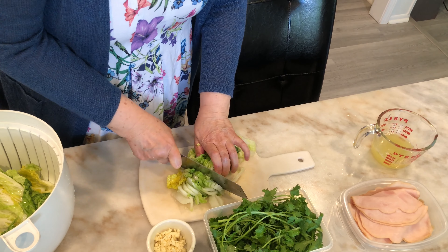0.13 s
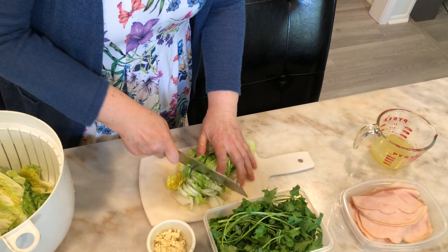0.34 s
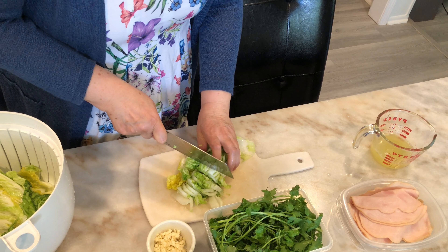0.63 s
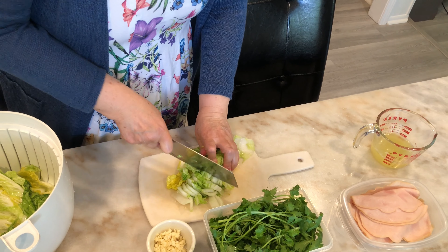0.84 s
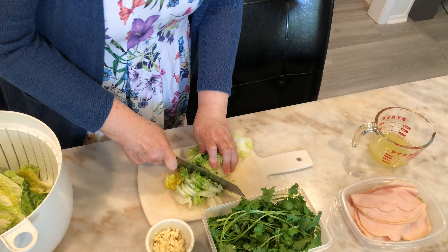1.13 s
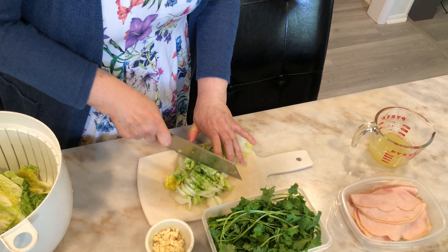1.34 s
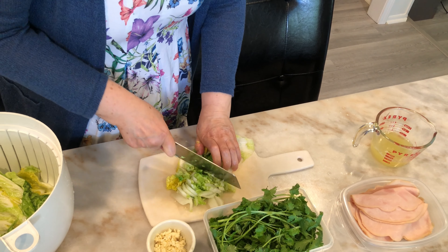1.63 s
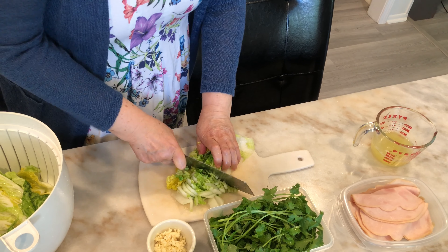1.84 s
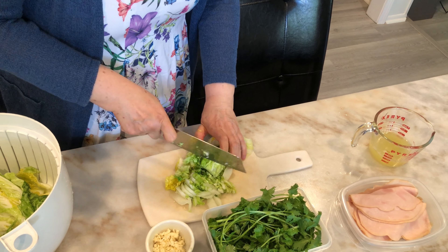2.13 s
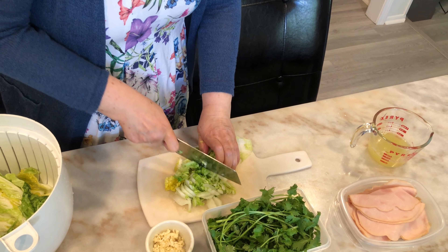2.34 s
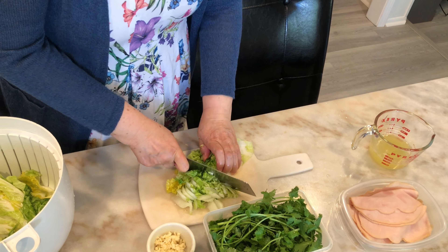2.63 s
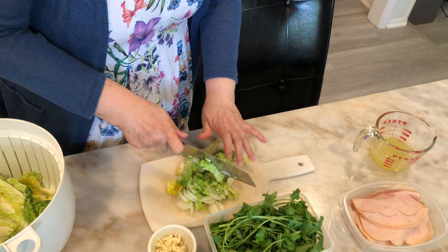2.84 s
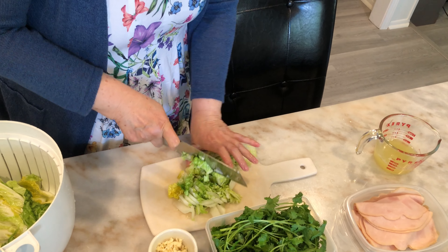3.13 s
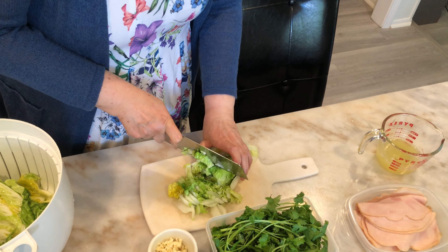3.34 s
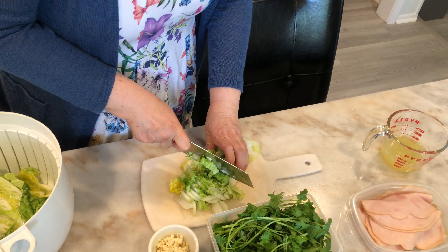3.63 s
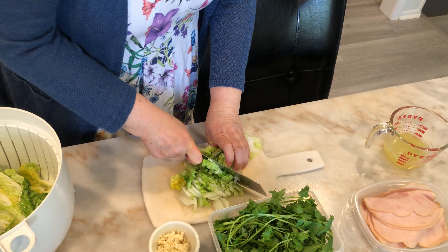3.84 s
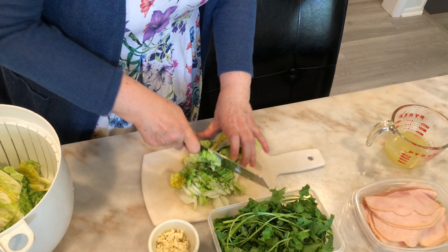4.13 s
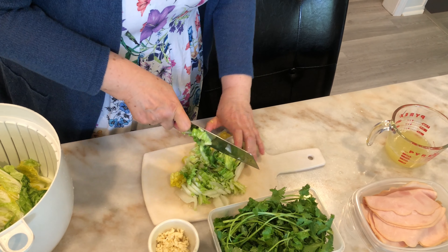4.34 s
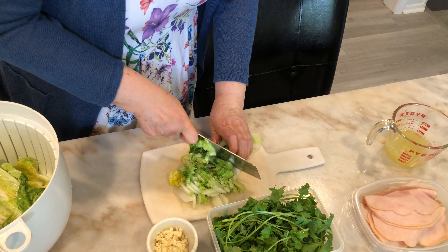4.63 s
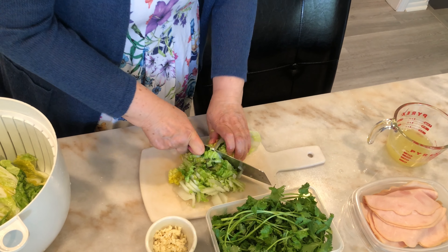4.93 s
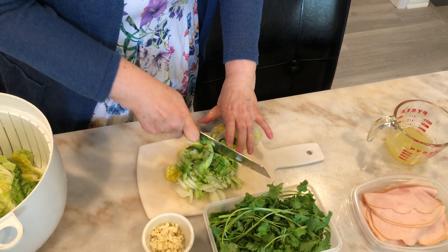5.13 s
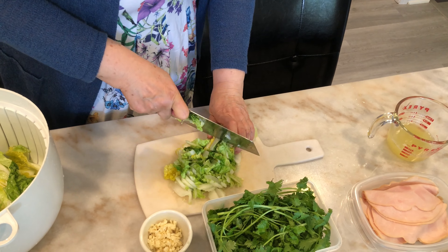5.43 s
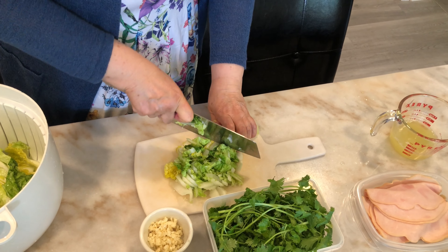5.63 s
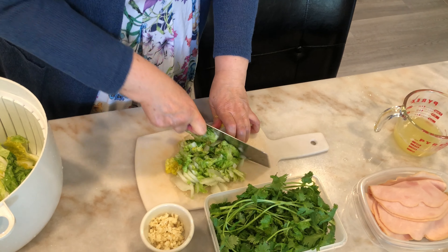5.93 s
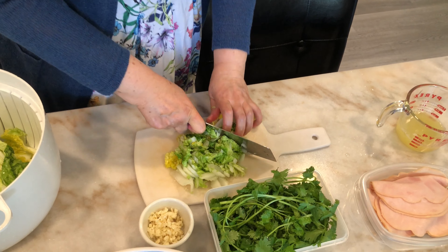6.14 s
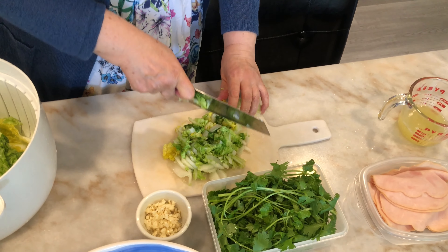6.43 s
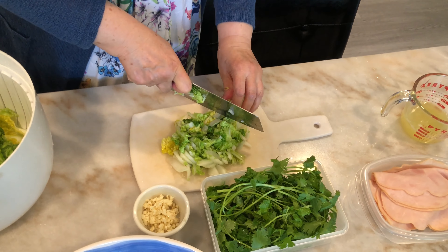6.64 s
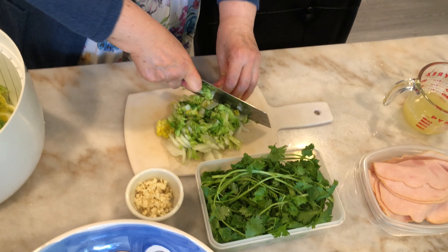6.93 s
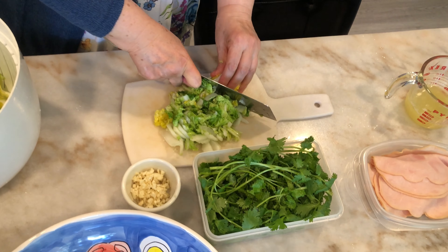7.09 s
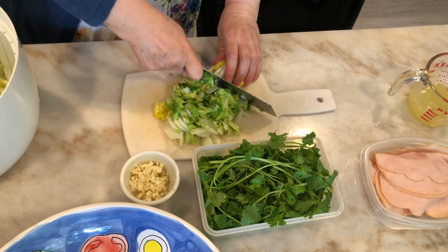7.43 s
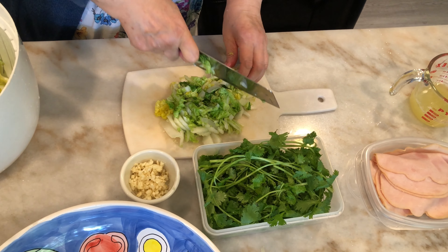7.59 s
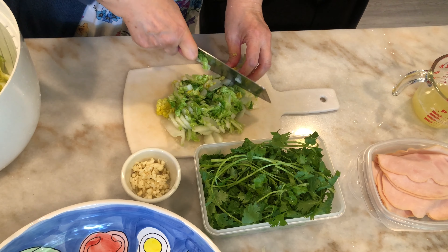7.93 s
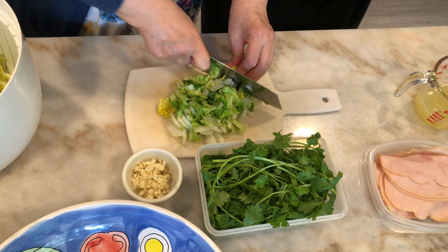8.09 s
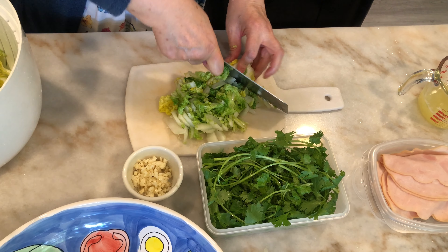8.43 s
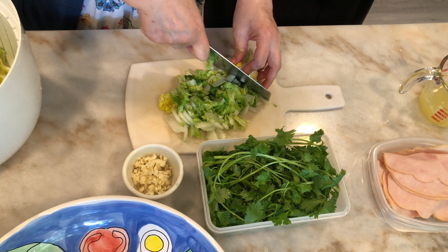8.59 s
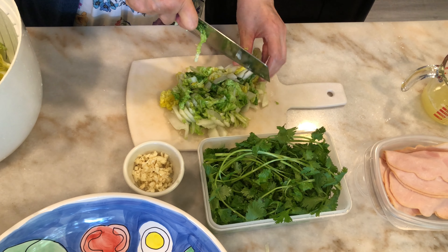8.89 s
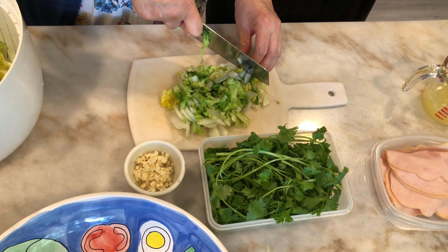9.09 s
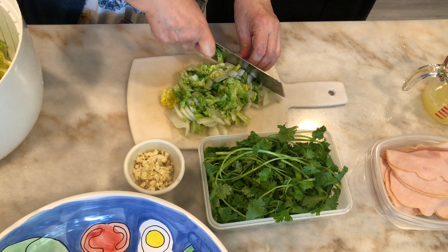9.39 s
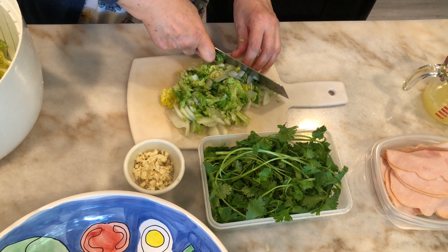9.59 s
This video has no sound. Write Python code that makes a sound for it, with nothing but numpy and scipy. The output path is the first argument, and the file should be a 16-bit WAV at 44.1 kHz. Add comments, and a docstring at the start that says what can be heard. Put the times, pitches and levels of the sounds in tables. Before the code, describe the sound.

A large knife slowly cuts cabbage on a plastic board, each crunch ending in a knock, over a faint low kitchen hum.

```python
"""Shredding cabbage

A large knife cuts cabbage on a plastic board on a stone counter, about one stroke a second.
Each stroke is a swelling crunch of fracturing fibres that ends in an impact: the edge excites the
modes of the board and the counter booms. An appliance hums low in the quiet, reverberant kitchen.
The stereo image is now wide and crisp, now narrow and duller."""
import sys
import numpy as np
from scipy import signal
from scipy.fft import rfft, irfft, next_fast_len
from scipy.io import wavfile

SR = 44100
rng = np.random.default_rng(int(sys.argv[2]) if len(sys.argv) > 2 else 0)


def transcribe(u):
    """Save the signal u as a 16-bit wav file named by the first command-line argument.

    u: samples, shape (n,) or (channels, n), limited to [-1, 1]; the rate is SR.
    q: integer samples, one column per channel.
    """
    v = np.clip(np.atleast_2d(u).T, -1, 1)
    q = np.round(v * 32767).astype(np.int16)
    wavfile.write(sys.argv[1], SR, q)


N = 429975
TIME = np.arange(N) / SR

# Levels in the tables are relative: each layer adds a gain of its own.
# Strokes of the blade; down_s is its arrival at the board, draw_db the step in level as it slides on:
# down_s, descent_s, snap_db, crush_db, shear_db, push_db, pinch_db, draw_db
STROKES = [(0.419, 0.14, -44.5, -42.5, -55, -29, -36, 0), (1.339, 0.17, -48.5, -50.5, -85, -49, -20, -6),
           (2.17, 0.18, -47.5, -45.5, -64, -43, -38, -5), (2.879, 0.12, -45, -40.5, -61, -39.5, -37, -1.5),
           (4.205, 0.13, -43, -42, -68.5, -36, -50, -0.5), (5.152, 0.18, -42.5, -38.5, -53, -33, -38, -7),
           (6.336, 0.15, -45.5, -42.5, -62, -40, -51.5, -1.5),
           (7.374, 0.22, -46, -44.5, -62, -41.5, -35.5, -2),
           (8.519, 0.26, -50, -51, -59, -43.5, -35.5, -1.5), (9.75, 0.26, -51, -61, -55, -45.5, -40, -5)]
# Impacts of the edge on the board: time_s, peak_db, boom_db, ring_db, treble_db
KNOCKS = [(0.417, -17, -13.5, -32.5, -55), (1.338, -8.5, -19.5, -22, -22), (2.17, -27, -44, -43.5, -50),
          (2.879, -24, -36, -33, -58), (4.206, -22.5, -21, -44, -49), (4.221, -29, -38.5, -40.5, -38),
          (5.152, -16, -15.5, -27.5, -56), (6.334, -20.5, -44.5, -32, -51), (7.372, -24, -40, -35, -32),
          (8.521, -22, -45, -41.5, -28.5), (8.553, -34, -34.5, -34.5, -42), (9.724, -29, -30.5, -51, -29.5)]
# Soft bumps of hand and knife against the board: time_s, scuff_db, boom_db
BUMPS = [(0.195, -59, -33), (8.755, -58.5, -40.5), (8.889, -41.5, -26.5), (8.922, -35, -28),
         (8.945, -40, -22.5), (9.003, -46, -26), (9.023, -56.5, -27), (9.558, -70, -33),
         (9.629, -74, -32.5)]
# Spectrum of the crisp crunch as heard through the narrow, duller microphone pickup:
# frequency_hz, level_db
HEARD_CRUNCH = [(100, -26), (900, -7), (1800, -0.5), (3000, 3), (4100, -3.5), (6000, -7.5), (7200, -22.5),
                (9500, -28), (11200, -38.5), (12400, -16.5), (15500, -31)]
# Spectrum of the contact between edge and board: frequency_hz, level_db
CONTACT_SPECTRUM = [(40, -15.5), (130, -3.5), (320, 6), (700, -4), (1300, -2.5), (2000, -5.5),
                    (3200, -10.5), (5000, -22), (12000, -64)]


def from_db(db):
    """Amplitude ratio of a level in decibels."""
    return 10 ** (np.asarray(db) / 20)


def at_hz(points, hz, axis=1):
    """Interpolation of one table column on a logarithmic frequency axis."""
    points = np.array(points, float)
    return np.interp(np.log(hz + 1e-3), np.log(points[:, 0]), points[:, axis])


def convolve(x, response):
    """A linear system convolves its input with its impulse response."""
    return signal.oaconvolve(x, response)[:N]


def pulse(spectrum, size=4096):
    """Folding the cepstrum gives a minimum-phase pulse with this spectrum, scaled to unit energy."""
    hz = np.fft.rfftfreq(size, 1 / SR)
    cepstrum = irfft(np.log(from_db(at_hz(spectrum, hz))))
    cepstrum[1:size // 2] *= 2
    cepstrum[size // 2 + 1:] = 0
    shape = irfft(np.exp(rfft(cepstrum)))
    return shape / np.linalg.norm(shape)


def clicks(times, level_db):
    """An impulse train, one impulse for each event."""
    out = np.zeros(N)
    out[np.clip(np.round(times * SR).astype(int), 0, N - 1)] = from_db(level_db)
    return out


def swell(rise_s):
    """A critically damped envelope that peaks at 1 after rise_s."""
    t = TIME[:SR // 2]
    return t / rise_s * np.exp(1 - t / rise_s)


def grains(per_s, spread_db):
    """Shot noise: impulses of random time, sign and size, scaled to rms 1."""
    sizes = from_db(spread_db * np.minimum(rng.exponential(1, N), 4))
    shots = sizes * rng.choice([-1, 1], N) * (rng.random(N) < per_s / SR)
    return shots / np.sqrt(np.mean(shots ** 2) + 1e-20)


def strike(times, level_db, spectrum, rise_s):
    """Each event is a superposition of tiny contacts in a brief flurry."""
    envelope = convolve(clicks(times, level_db), swell(rise_s))
    return convolve(envelope * grains(per_s=12000, spread_db=-2), pulse(spectrum))


def hum():
    """Stationary filtered noise: the low drone of an appliance over faint air noise."""
    # Spectrum of drone and air: frequency_hz, level_db
    hum_spectrum = [(15, -55.5), (25, -14), (59, -14.5), (101, -28), (169, -1.5), (253, -9.5), (567, -27.5),
                    (871, -32.5), (1050, -38), (2420, -39.5), (2920, -43.5), (3170, -43), (6920, -55),
                    (13900, -58.5), (15500, -71)]
    drone = convolve(rng.standard_normal(N), pulse(hum_spectrum))
    low_pass = signal.butter(4, 6500, fs=SR, output="sos")
    return from_db(-53) * signal.sosfilt(low_pass, drone)


def shifting():
    """Envelope of friction in the heap: smooth swells over a faint rustle under the hand."""
    # Leaves shifted by hand and blade between strokes: time_s, half_length_s, level_db
    shifts = [(0.134, 0.038, -68.5), (0.197, 0.041, -56.5), (0.81, 0.024, -72), (2.721, 0.016, -62),
              (3.836, 0.065, -65), (3.982, 0.032, -66), (5.777, 0.091, -70.5), (6.09, 0.016, -69),
              (6.585, 0.034, -69), (6.966, 0.052, -73), (7.154, 0.055, -74), (7.96, 0.1, -71),
              (8.216, 0.077, -69), (8.69, 0.056, -61.5), (8.952, 0.088, -65.5), (9.217, 0.054, -72.5),
              (9.453, 0.021, -72)]
    swells = sum(from_db(db) * np.maximum(1 - ((TIME - time_s) / (2 * half_s)) ** 2, 0) ** 2
                 for time_s, half_s, db in shifts)
    return from_db(-78.5) + swells


def clumps(depth_db=4, per_s=110):
    """Random amplitude modulation: leaf after leaf gives way, so the crunch comes in clumps."""
    return from_db(depth_db * np.interp(TIME * per_s, np.arange(N), rng.standard_normal(N)))


def cutting(top_db, swell_db, bend):
    """Envelope of fracture: it swells as the cut deepens, sags as the blade slides, dies as it lifts."""
    ease_in_s, creep_s, creep_db = 0.012, 0.065, -12
    draw_s, sag_db_per_s, lift_db_per_s = 0.034, 57.5, 389
    out = np.zeros(N)
    for (down_s, descent_s, *_, draw_db), db in zip(STROKES, top_db):
        near = np.abs(TIME - down_s) < .5
        t = TIME[near] - down_s
        sinking_db = -swell_db * np.clip(-t / descent_s, 0, 1) ** bend
        drawn_db = draw_db - sag_db_per_s * t - lift_db_per_s * np.maximum(t - draw_s, 0)
        # the edge creases the outer leaf before its first bite
        creep = from_db(creep_db) * np.exp(np.minimum(t + descent_s, 0) / creep_s)
        touch = np.clip((t + descent_s) / ease_in_s, creep, 1)
        out[near] += touch * from_db(db + np.where(t < 0, sinking_db, drawn_db))
    return out


def pinch(rise_s=0.0072, fall_s=0.0066):
    """Envelope of compression: the last leaves give way between edge and board in a short burst."""
    out = np.zeros(N)
    for down_s, *_, pinch_db, _ in STROKES:
        near = np.abs(TIME - down_s) < .1
        t = TIME[near] - down_s
        out[near] += from_db(pinch_db) * np.exp(np.minimum(t / rise_s, -t / fall_s))
    return out


def stray_cracks(envelope, spectrum, per_s, over_db):
    """A Poisson process of single cracks whose level follows a layer's envelope."""
    now = (rng.random(N) < per_s / SR) & (envelope > 0)
    return strike(TIME[now], 20 * np.log10(envelope[now]) + over_db, spectrum, rise_s=0.00031)


def cabbage():
    """Fracture and friction: fibres snap, leaf is crushed, steel hisses, ribs crack, shreds rustle."""
    # Fractures of thick ribs: time_s, peak_db
    rib_cracks = [(0.136, -52), (0.3007, -47), (0.3452, -30.5), (1.2695, -39.5), (2.002, -47), (2.058, -44),
                  (2.0815, -36), (2.7915, -40), (4.1, -38.5), (5.0066, -50), (5.0516, -34), (6.0832, -53),
                  (7.138, -46), (8.317, -40), (8.3422, -37), (8.4938, -29), (8.7012, -44), (9.0795, -48),
                  (9.2178, -52), (9.507, -44.5), (9.637, -48), (9.6784, -41)]
    # Spectrum of leaf being crushed: frequency_hz, level_db
    crush_spectrum = [(60, -11), (300, 6.5), (560, -3.5), (690, 6.5), (850, 0.5), (1250, -0.5), (1700, 0.5),
                      (2800, -16.5), (9000, -56.5)]
    # Spectrum of steel sliding through wet leaf: frequency_hz, level_db
    shear_spectrum = [(1000, -35.5), (3500, -21.5), (5800, 0.5), (7000, -11), (9500, -22.5), (11200, -21.5),
                      (12400, -26), (15500, -28.5)]
    # Spectrum of rustling shreds as heard through the narrow, duller microphone pickup:
    # frequency_hz, level_db
    heard_rustle = [(400, -6.5), (750, 2.5), (1400, 2), (2300, -0.5), (3300, -5), (4300, -14), (5800, -13),
                    (7200, -30), (11200, -33.5), (12500, -25.5), (15500, -38.5)]
    snap_db, crush_db, shear_db = np.transpose(STROKES)[2:5]
    giving, loose = clumps(), shifting()
    fibres = cutting(snap_db, swell_db=19, bend=1.6)
    leaf = cutting(crush_db, swell_db=22.5, bend=1.3) + pinch()
    snaps = fibres * giving * grains(per_s=4500, spread_db=2.5) * from_db(-4.5)
    crush = leaf * giving * grains(per_s=2000, spread_db=5.5) * from_db(-2)
    friction = grains(per_s=9000, spread_db=1)
    shear = cutting(shear_db, swell_db=15, bend=2.6) * clumps() * friction * from_db(-7)
    shreds = loose * clumps() * grains(per_s=1100, spread_db=2) * from_db(-3.5)
    times, peak_db = np.transpose(rib_cracks)
    thick_ribs = strike(times, peak_db - 7.5, HEARD_CRUNCH, rise_s=0.00074)
    thick_ribs += strike(times, peak_db - 12.5, crush_spectrum, rise_s=0.0014)
    small_ribs = stray_cracks(fibres, HEARD_CRUNCH, per_s=30, over_db=6)
    ticks = stray_cracks(loose, heard_rustle, per_s=14, over_db=10)
    layers = ((snaps, HEARD_CRUNCH), (crush, crush_spectrum),
              (shear, shear_spectrum), (shreds, heard_rustle))
    crunch = sum(convolve(source, pulse(spectrum)) for source, spectrum in layers)
    return thick_ribs + small_ribs + ticks + crunch


def bumps():
    """Soft contact carries little treble: hand and handle touch and drag dully on the board."""
    # Spectrum of a scuff: frequency_hz, level_db
    scuff_spectrum = [(40, -24), (120, -17), (300, 16.5), (450, 14), (560, 1), (690, 14), (820, -5),
                      (1400, -21.5), (2500, -57), (9000, -85)]
    times, scuff_db, _ = np.transpose(BUMPS)
    touch = strike(times, scuff_db + 4, scuff_spectrum, rise_s=0.0027)
    drag = strike(times, scuff_db - 4, scuff_spectrum, rise_s=0.02)
    return touch + drag


def boom(times, level_db, rise_s):
    """A damped resonance of the counter builds and decays; its pitch varies with the spot struck."""
    nominal_hz, dip, settle_s = 177.7, 0.12, 0.019   # it starts flat under the load of the blade
    out, t = np.zeros(N + SR), TIME[:SR // 2]
    cycles = nominal_hz * np.cumsum(1 - dip * np.exp(-t / settle_s)) / SR
    for time_s, db, detune in zip(times, level_db, rng.uniform(-0.022, 0.029, len(times))):
        at = int(time_s * SR)
        out[at:at + len(t)] += from_db(db) * swell(rise_s) * np.sin(2 * np.pi * cycles * (1 + detune))
    return out[:N]


def counter(rock_s=0.055):
    """Impacts excite the counter, again as the board rocks back; a resting hand damps a bump's boom."""
    knock_s, _, knock_db, _, _ = np.transpose(KNOCKS)
    bump_s, _, bump_db = np.transpose(BUMPS)
    struck = boom(knock_s, knock_db - 1, rise_s=.023)
    rocked = boom(knock_s + rock_s, knock_db - 12.5, rise_s=0.02)
    return struck + rocked + boom(bump_s, bump_db - 1, rise_s=0.014)


def push():
    """Forced vibration: the blade sinks in jerks, each shaking the board through the leaves."""
    # Spectrum of the board's response to a jerk: frequency_hz, level_db
    push_spectrum = [(20, -19.5), (45, -1.5), (85, -3), (120, -3), (150, 4), (176, 5.5), (215, -10.5),
                     (300, -13.5), (600, -37), (3000, -85.5)]
    push_db = np.transpose(STROKES)[5]
    force = cutting(push_db, swell_db=22.5, bend=1.8) * grains(per_s=500, spread_db=4.5)
    return convolve(force, pulse(push_spectrum)) * from_db(7.5)


def edge_db():
    """Cushioning: leaves under the edge take more treble from a weaker blow."""
    _, peak_db, _, _, treble_db = np.transpose(KNOCKS)
    return treble_db + .5 * (peak_db - peak_db.max())


def board(times, level_db, soft_hz, vary_db):
    """Modal superposition: each blow rings the modes with random strengths, weakly above soft_hz."""
    # Modes of board and blade: frequency_hz, level_db, t60_s
    modes = [(113.7, 3.5, 0.32), (229.3, 0, 0.39), (281, 1.5, 0.38), (350.4, -1.5, 0.33), (456, -5, .15),
             (685, -18, 0.068), (686, 8.5, 0.16), (1013, -7, 0.06), (1313, -11, 0.093), (1755, -3, 0.081),
             (1893, -18.5, 0.13), (2390, -17, 0.45), (3023, -14, 0.19), (3500, -6.5, 0.073),
             (3550, -7.5, 0.19)]
    out, t = np.zeros(N + SR), TIME[:SR // 2]
    scatters = rng.standard_normal((len(times), len(modes)))
    hz, mode_db, t60_s = np.transpose(modes)
    rings = np.sin(2 * np.pi * hz[:, None] * t) * from_db(-60 * t / t60_s[:, None])
    for time_s, db, scatter in zip(times, level_db, scatters):
        at = int(time_s * SR)
        strengths = from_db(db + mode_db + vary_db * scatter) / (1 + (hz / soft_hz) ** 4)
        signs = np.sign(np.roll(scatter, 1))
        out[at:at + len(t)] += (strengths * signs) @ rings
    return out[:N]


def knocks():
    """Impact and free vibration: the edge lands through the last leaves and the board rings."""
    times, peak_db, _, ring_db, _ = np.transpose(KNOCKS)
    contact = strike(times, peak_db - 7.5, CONTACT_SPECTRUM, rise_s=0.0015)
    edge = strike(times, edge_db() - 12.5, HEARD_CRUNCH, rise_s=0.002)
    return contact + edge + board(times, ring_db - 8.5, soft_hz=3500, vary_db=-4.5)


def knock_claps():
    """Impulsive excitation of the room: each landing reaches the walls as a single clap."""
    times, peak_db = np.transpose(KNOCKS)[:2]
    contact = convolve(clicks(times, peak_db), pulse(CONTACT_SPECTRUM))
    edge = convolve(clicks(times, edge_db() + 10.5), pulse(HEARD_CRUNCH))
    return from_db(14.5) * (contact + edge)


def kitchen(x, early_t60_s=0.15, early_db=-1, tail_t60_s=0.42, build_s=0.0025):
    """Reverberation: early reflections from counter and cupboards, then the room's exponential tail."""
    t = TIME[:int(.7 * SR)]
    decay = from_db(-60 * t / tail_t60_s) + from_db(early_db - 60 * t / early_t60_s)
    echoes = rng.standard_normal(len(t)) * decay * (1 - np.exp(-t / build_s))
    return convolve(x, echoes / np.linalg.norm(echoes))


def image_width(fade_s=0.19):
    """Linear crossfades set the width of the stereo image, from 0 (narrow) to 1 (wide)."""
    # Stretches with a widened image: start_s, end_s, width_fraction
    stretches = [(-0.1, 0.8, 0.95), (1.25, 1.42, 0.06), (4.07, 4.917, 0.41), (4.875, 5.46, 0.72),
                 (8.658, 9.903, 0.6)]
    return sum(width * np.clip(np.minimum(TIME - start_s, end_s - TIME) / fade_s + .5, 0, 1)
               for start_s, end_s, width in stretches)


def high_pass(x, corner_hz):
    """A Butterworth filter passes the treble."""
    return signal.sosfilt(signal.butter(6, corner_hz, "high", fs=SR, output="sos"), x)


def stereo(middle, diffuse, shake):
    """Mid-side stereo: a wide image is crisp with a strong side; a narrow one has only a treble side."""
    # Frequency response of the wide image: frequency_hz, gain_db
    wide_colour = [(60, -4), (120, 2.5), (180, 2.5), (280, -4), (650, -2.5), (1300, -2), (3000, -3.5),
                   (5200, -4), (6300, 4), (7500, 12.5), (10800, 11.5), (12400, 1), (15500, -3.5)]
    # Its side signal relative to the middle: frequency_hz, gain_db, phase_rad
    wide_side = [(50.3, -6.5, 2.2), (110, -3.5, 1.4), (174, 5, 2.77), (280, -4, 1.6), (450, 5.5, 2.0),
                 (714, 6.5, 2.2), (900, 5.5, 1.6), (1350, 8.5, 1.5), (2000, -1, 1.6), (4200, -7, 1.6),
                 (7500, -1, 1.8), (12500, -3.5, 0.4)]
    width, size = image_width(), 2 * next_fast_len(N // 2 + SR)
    hz = np.fft.rfftfreq(size, 1 / SR)
    colour = from_db(at_hz(wide_colour, hz))
    end_taper = np.clip((TIME[-1] - TIME) / .004, 0, 1)
    wide_spectrum = rfft(middle * end_taper, size) * colour
    side_response = from_db(at_hz(wide_side, hz)) * np.exp(1j * at_hz(wide_side, hz, axis=2))
    shifted = irfft(wide_spectrum * side_response)[:N]
    sparkle = from_db(1) * irfft(rfft(high_pass(diffuse, corner_hz=6000), size) * colour)[:N]
    narrow_side = from_db(3) * high_pass(diffuse, corner_hz=11800)
    side = width * (shifted + shake + sparkle) + (1 - width) * narrow_side
    mid = width * irfft(wide_spectrum)[:N] + (1 - width) * middle
    return mid + side * np.array([[1], [-1]])


def scene():
    """Superposition of cutting, board, counter and hum with the reverberation of the kitchen."""
    leaves = cabbage()
    airborne = leaves + knock_claps()
    room, diffuse = kitchen(airborne), kitchen(airborne)   # two uncorrelated sets of reflections
    thud = from_db(-6 * image_width()) * push()
    # in the wide image, vibration through the counter moves the two microphones against each other
    shake = from_db(1.5) * push() + knocks()
    middle = from_db(-1) * leaves + room + knocks() + counter() + bumps() + thud + hum()
    return stereo(middle, diffuse, shake)


def record(dry):
    """Self-noise and band limiting: the microphones add faint hiss; deep rumble and the top are cut."""
    hiss = from_db(-87.5) * rng.standard_normal((2, N))
    low_hz, top_hz = 22, 15750
    low_cut = signal.butter(2, low_hz, "high", fs=SR, output="sos")
    top_cut = signal.ellip(12, .1, 80, top_hz, fs=SR, output="sos")
    return signal.sosfilt(np.vstack([low_cut, top_cut]), dry + hiss)


dry = scene()
out = record(dry)
transcribe(out)
```